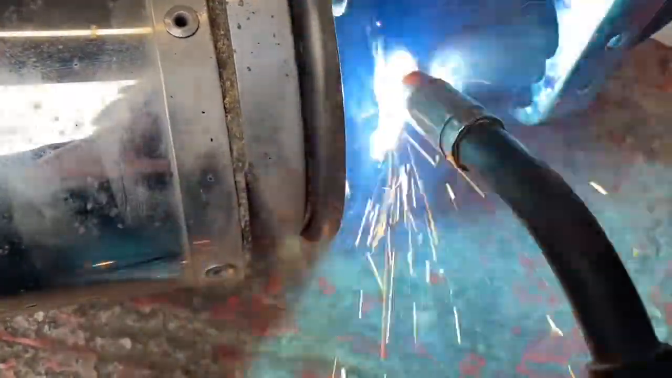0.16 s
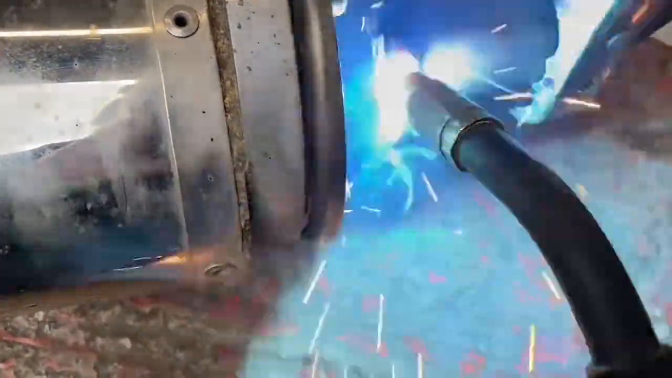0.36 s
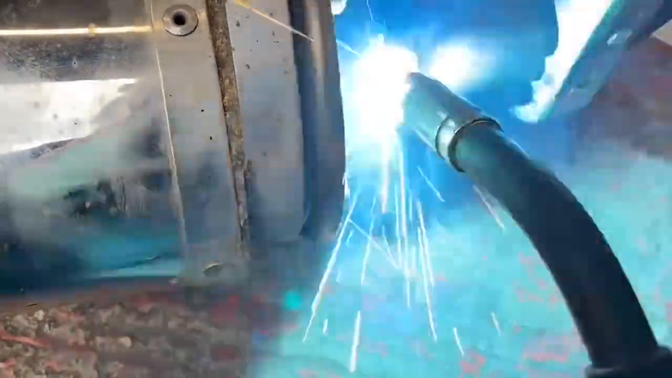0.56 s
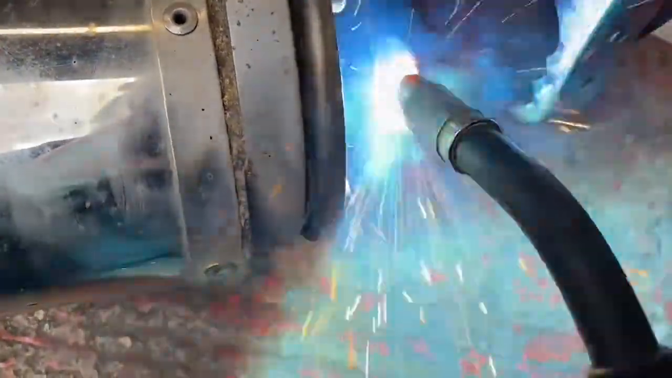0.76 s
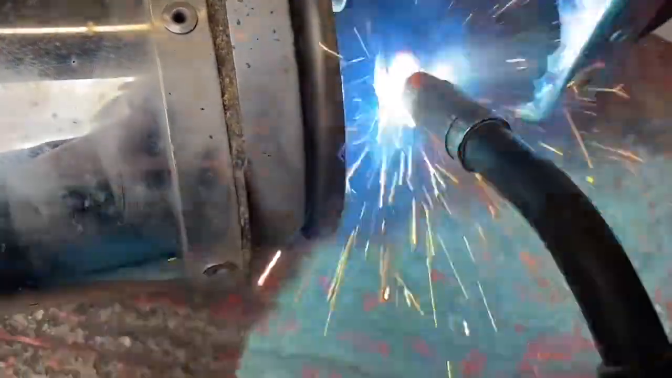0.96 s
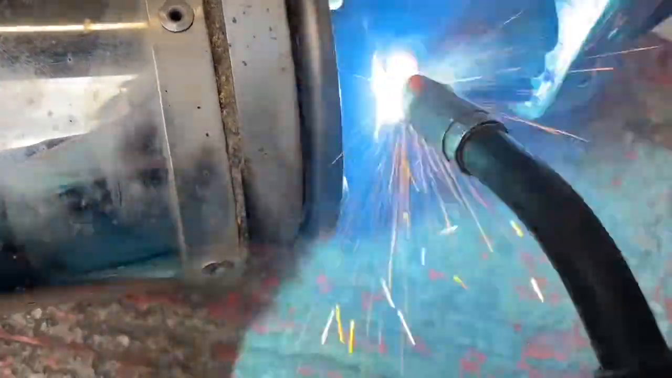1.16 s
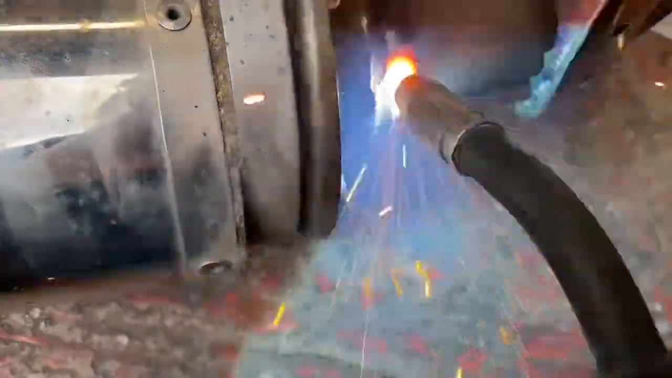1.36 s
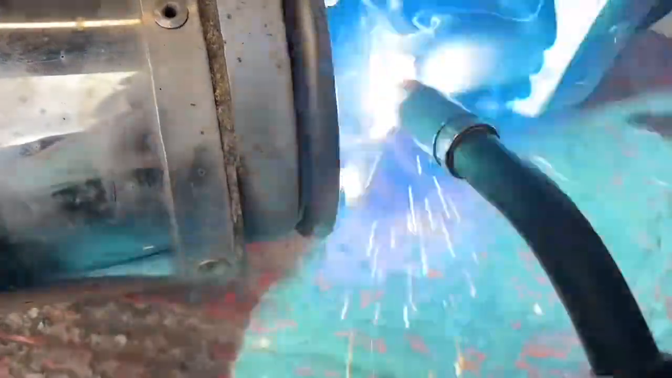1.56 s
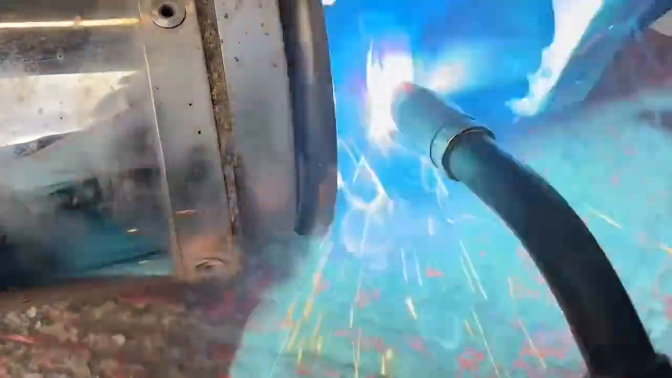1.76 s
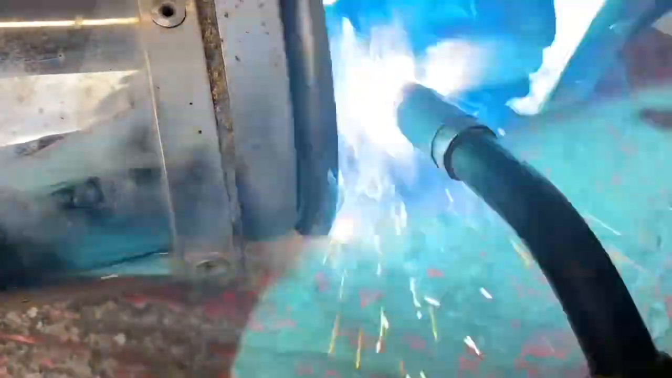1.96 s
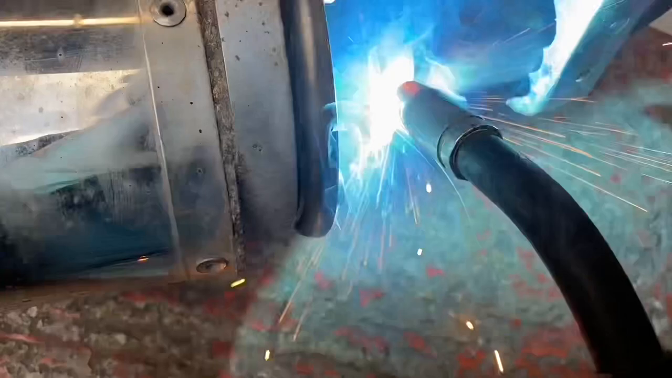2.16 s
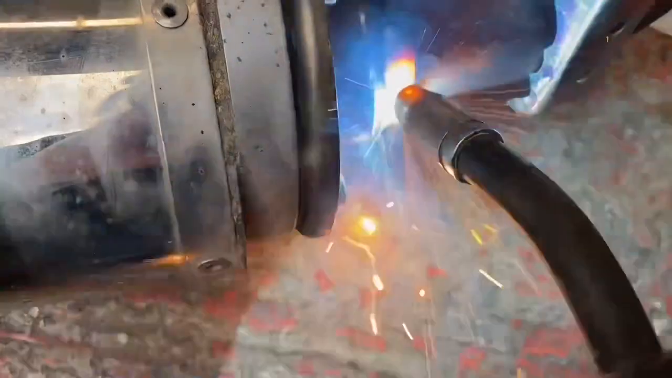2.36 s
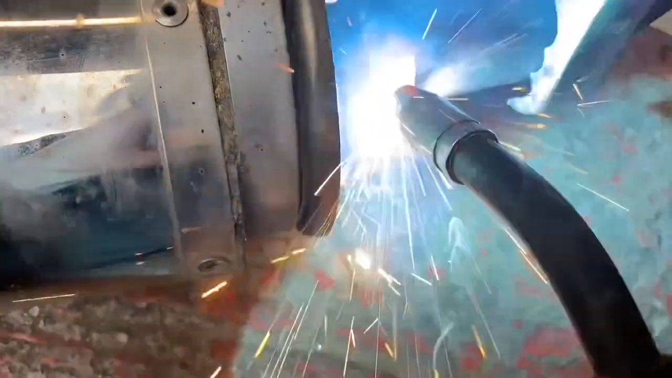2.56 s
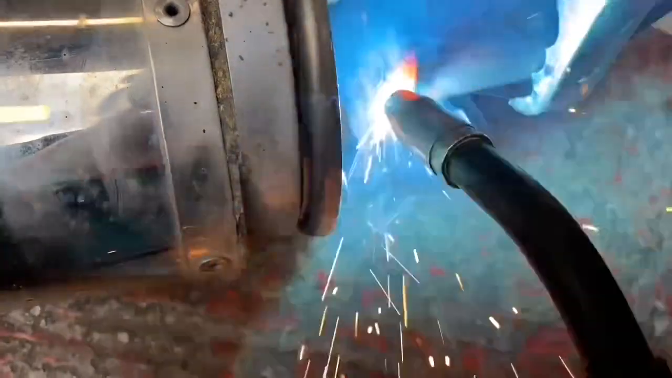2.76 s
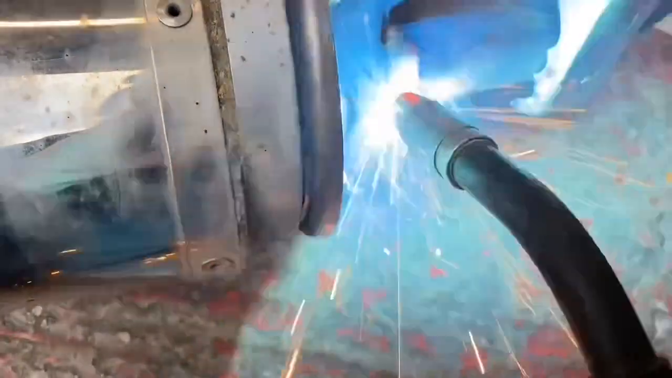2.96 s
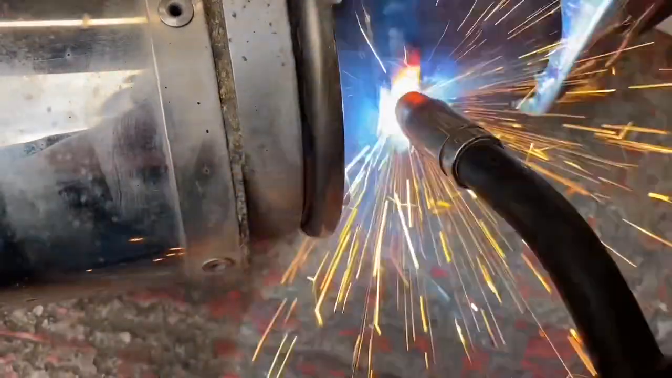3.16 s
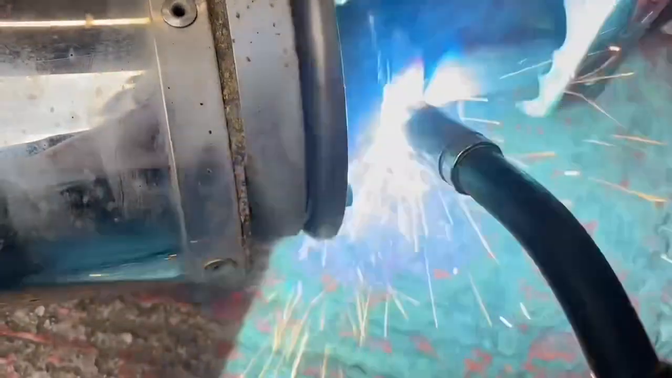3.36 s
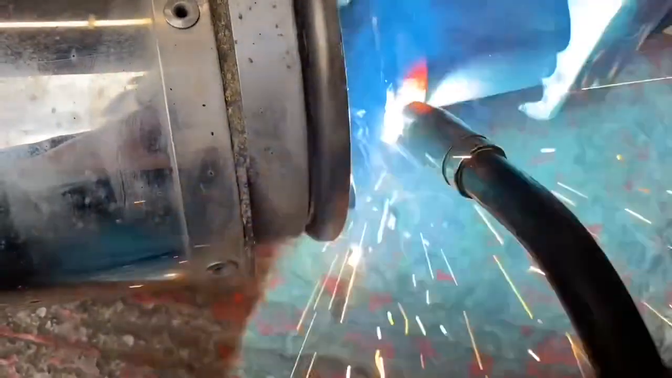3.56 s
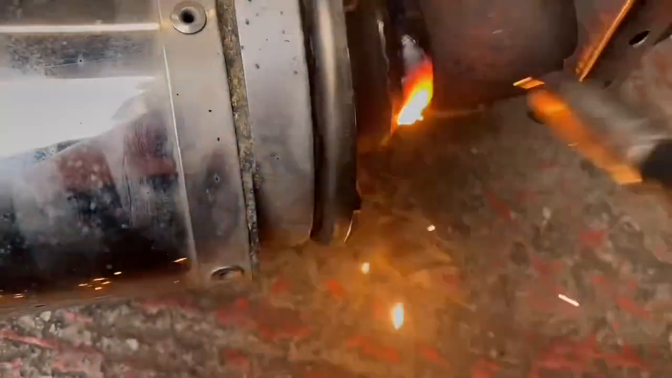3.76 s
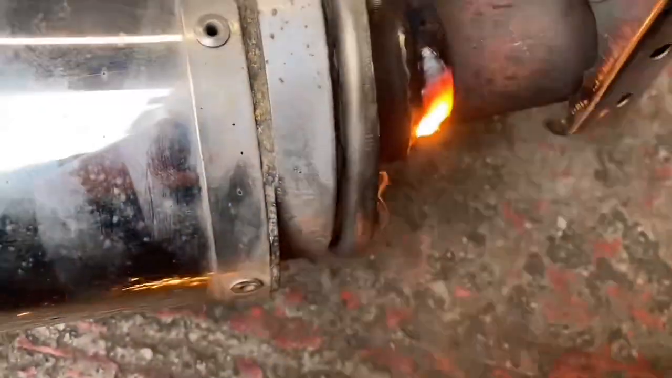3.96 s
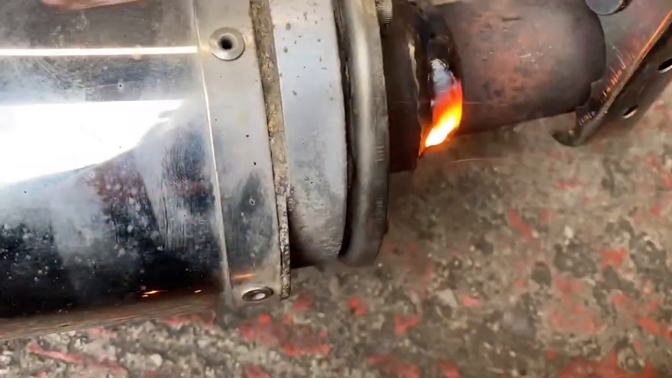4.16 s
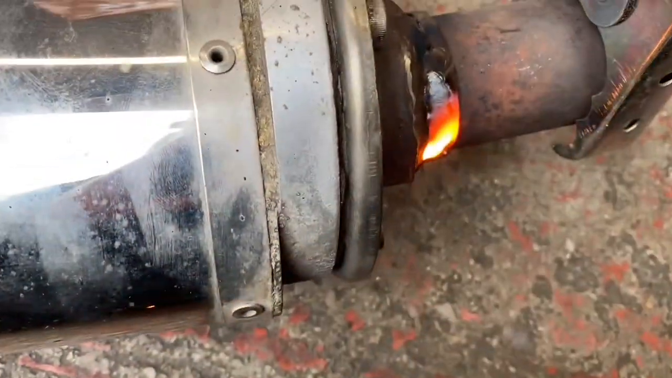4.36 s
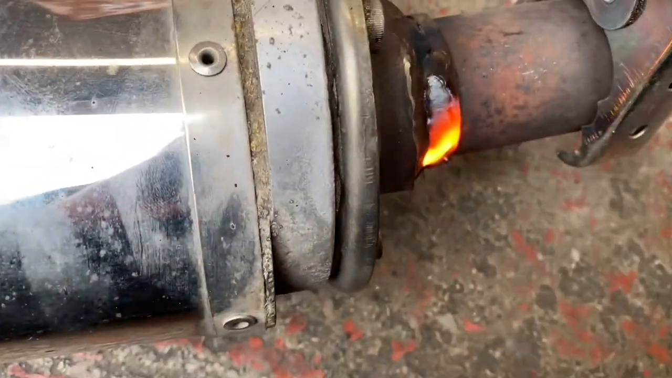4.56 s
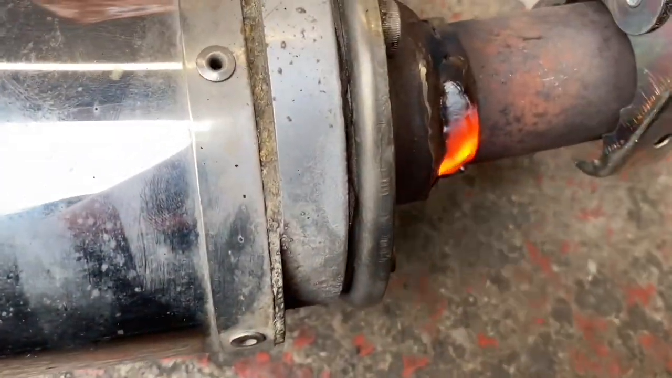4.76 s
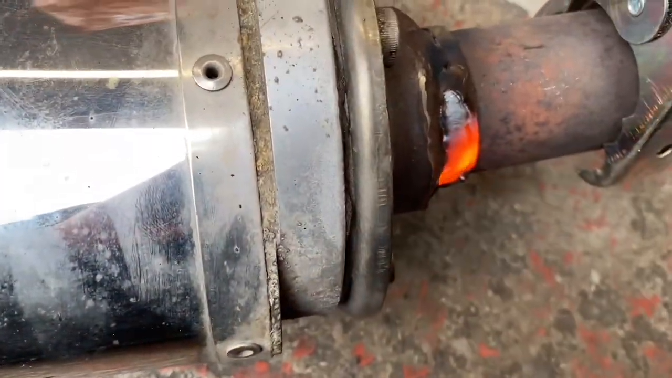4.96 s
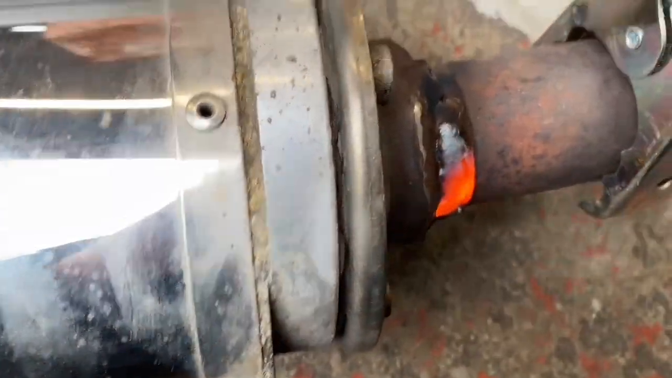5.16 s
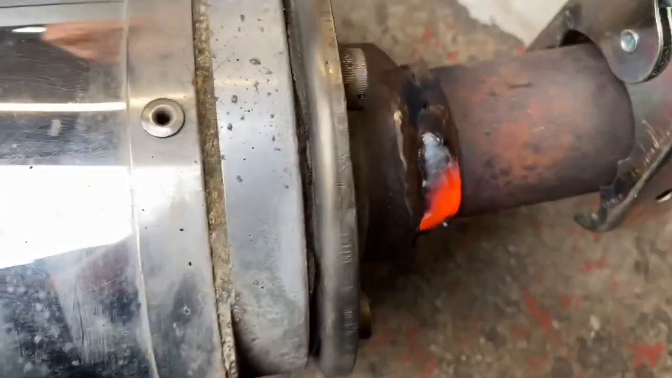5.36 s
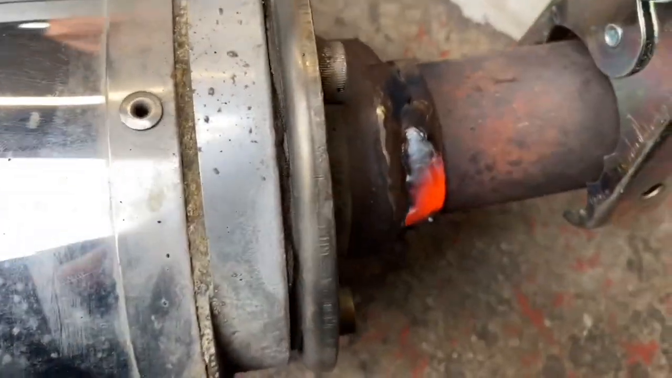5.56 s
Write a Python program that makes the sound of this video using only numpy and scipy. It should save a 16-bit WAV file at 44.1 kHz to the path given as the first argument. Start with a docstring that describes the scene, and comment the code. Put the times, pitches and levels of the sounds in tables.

```python
"""A MIG welding arc runs a bead round a steel exhaust pipe, close by in a workshop.
On every second or third swell of the current, in flurries on each one, the wire shorts and the arc
relights: it cracks, sprays spatter and excites the pipe's resonances, and sizzles in between.
The transformer hums under the load and big drops burst with a thump. The arc stops, the hot joint
ticks, the torch knocks lightly, and a low drone goes on over the noise of the room."""
import sys
import numpy as np
from scipy import signal
from scipy.fft import rfft, irfft
from scipy.io import wavfile
from scipy.ndimage import uniform_filter1d

SR = 44100
rng = np.random.default_rng(int(sys.argv[2]) if len(sys.argv) > 2 else 0)


def wav_record(signal):
    """Record a signal, one row per channel, as 16-bit PCM in the file named by sys.argv[1]."""
    frames = np.transpose(np.atleast_2d(signal))
    bounded = np.clip(frames, -1, 1)
    # unit amplitude maps onto the largest positive 16-bit level
    quanta = np.round(bounded * 32767).astype(np.int16)
    wavfile.write(sys.argv[1], SR, quanta)


N = 247401
T = np.arange(N) / SR
PAD = 2 ** 18
HZ = np.arange(PAD // 2 + 1) * SR / PAD + 1e-3
SIDES = np.array([[.5], [-.5]])  # shares a level or phase difference between left and right
MAINS_HZ, SWELL_S = 50, .01  # the rectified current swells twice in each mains cycle
FIRST_CREST_S, ARC_OFF_S = .0034, 3.628

# Levels in the tables are relative; each source adds its own gain and filtering.
# loudest relights of the arc: (time [s], crack level [dB], spatter level [dB])
LOUD_RELIGHTS = [(0.033, -6, -16.5), (0.0629, -4.5, -12.5), (0.115, -10, -9.5), (0.1419, -9, -19),
                 (0.1631, -6.5, -13.5), (0.1822, -5, -14), (0.2025, -5.5, -20.5), (0.2324, -9, -21),
                 (0.2631, -6, -12), (0.282, -6.5, -17), (0.3331, -10.5, -19.5), (0.343, -3.5, -28.5),
                 (0.3945, -6.5, -10.5), (0.443, -11.5, -15), (0.493, -7, -25), (0.5329, -8.5, -10.5),
                 (0.563, -11, -8.5), (0.585, -9, -15), (0.6017, -14, -6), (0.6723, -6, -21),
                 (0.6945, -9.5, -10.5), (0.7325, -9, -17.5), (0.7523, -7, -17), (0.7932, -7.5, -18.5),
                 (0.8129, -10, -18), (0.8528, -7, -20.5), (0.8833, -9.5, -9.5), (0.9325, -9, -22),
                 (0.9625, -8, -8), (1.0136, -6, -15), (1.1416, -8.5, -23), (1.2226, -5.5, -7.5),
                 (1.2742, -9.5, -14.5), (1.3129, -7.5, -18), (1.3224, -6, -19.5), (1.351, -10, -15),
                 (1.3757, -11.5, -17.5), (1.4028, -6, -7.5), (1.4744, -10, -4), (1.4848, -3, -12.5),
                 (1.5358, -5, -16.5), (1.5622, -6.5, -14.5), (1.5922, -12, -8), (1.655, -3, -7),
                 (1.673, -13.5, -8), (1.7622, -9, -16.5), (1.8036, -4, -16.5), (1.8831, -11, -15),
                 (1.9049, -10, -10), (1.9322, -8, -10.5), (1.9828, -9, -5.5), (2.042, -10.5, -20),
                 (2.0647, -8.5, -16.5), (2.103, -7.5, -14), (2.125, -2.5, -12), (2.1514, -7, -17.5),
                 (2.172, -8, -15.5), (2.2538, -9, -10.5), (2.321, -12, -15), (2.4133, -11.5, -12),
                 (2.4937, -14, -8), (2.5328, -12, -12.5), (2.5621, -9, -12), (2.5725, -6.5, -16),
                 (2.6727, -9, -15), (2.7018, -6, -17), (2.7321, -6, -16.5), (2.7842, -5, -6.5),
                 (2.8043, -9, -2.5), (2.8914, -8.5, -14.5), (2.922, -18.5, -9.5), (2.9716, -9, -19.5),
                 (3.0046, -10, -19.5), (3.1344, -7.5, -19), (3.2125, -10.5, -20.5), (3.2436, -7.5, -3.5),
                 (3.2627, -6, -17.5), (3.303, -10.5, -4.5), (3.3335, -2, -6), (3.362, -5, -4),
                 (3.4131, -6.5, -9.5), (3.4361, -5.5, -6), (3.4635, -4.5, -7.5), (3.5035, -7.5, -13.5),
                 (3.5241, -6, -10), (3.544, -4.5, -13)]
# flurries, in which the wire shorts on every swell: (start [s], end [s])
FLURRY_SPANS = [(.38, 0.44), (.61, .64), (.75, 0.83), (.88, 0.93), (.96, 1.032), (1.16, 1.207), (1.42, 1.5),
                (1.59, 1.706), (2.19, 2.22), (3.04, 3.19), (3.57, 3.65)]
# lulls in which the ordinary cracks pause: (start [s], end [s])
LULL_SPANS = [(.07, 0.15), (.35, .37), (.45, .49), (2.07, 2.135), (2.54, 2.56), (2.81, 2.85), (3.27, 3.3)]
# ordinary drops fed by the wire: (time [s], interval [s], level [dB])
WIRE_FEED = [(0, .027, -1), (.2, .024, -1), (.65, .021, 0), (1.1, .021, -1), (1.3, .027, -1),
             (1.5, .023, 1), (1.8, .025, -1), (2.05, .028, -1), (2.35, .022, -2), (2.7, .029, -1),
             (3.1, .023, -1.5), (3.3, .03, 0), (3.6, .021, -3)]
# burning arc: (time [s], sizzle level [dB], spitting level [dB], gain of the cracks' body [dB])
ARC_LEVELS = [(0, -47.5, -33.5, 1), (.4, -49, -44.5, 2), (.7, -45, -42, 1), (1.2, -53, -48, 0.5),
              (1.6, -46.5, -40.5, -1.5), (2, -56, -41, -2), (2.45, -53.5, -37.5, -1),
              (2.9, -51.5, -39.5, -2.5), (3.15, -49.5, -38, -2), (3.62, -54.5, -43.5, -1.5)]
# modes of the pipe and gas nozzle: (frequency [Hz], bandwidth [Hz], level [dB])
PIPE_MODES = [(836, 70, -8), (1800, 380, 1.5), (2730, 110, -3), (3180, 130, -5.5), (3870, 240, 2),
              (5430, 240, -5.5), (5440, 300, -1.5), (5670, 63, -6.5), (6360, 90, -9), (7080, 110, 1.5),
              (7700, 250, -4.5), (10730, 110, -6.5), (11340, 100, -3), (11410, 180, 1.5), (15340, 400, 0)]
# narrow dips in the arc's treble: (frequency [Hz], bandwidth [Hz], level subtracted [dB])
ARC_DIPS = [(3570, 200, -9.5), (8680, 780, -6), (13650, 1000, -4)]
# arc spectrum at the two microphone ports: (frequency [Hz], left gain [dB], right gain [dB])
ARC_SPECTRUM = [(374, -7.5, -4), (725, -13, -9.5), (1335, -7.5, -6), (1740, -5, -0.5), (2410, -8, -4),
                (3500, -11.5, -4.5), (4696, -19, -5), (5500, -9, 3.5), (6370, -7, -3), (8300, -8, -7.5),
                (10030, -6.5, -7.5), (11300, -6, -5.5), (13290, -5.5, -5), (15700, -9, -9.5)]
# phase difference between the ports: (frequency [Hz], lead of the left [rad])
PORT_LEAD = [(300, 1.24), (1100, 0.72), (2000, -0.78), (3200, -2), (5200, -2.5), (6500, -5), (7600, -6),
             (8600, -3.5), (11200, 0.5), (13300, 2), (16000, 7.5)]
# tone colour of the reverberant tail, with two treble dips: (frequency [Hz], gain [dB])
TAIL_COLOUR = [(150, 5.5), (330, 7), (520, 1), (1200, 1.5), (2000, -2.5), (3500, -1.5), (5500, 1),
               (7500, -1), (9000, -11), (11300, -8), (13500, -13), (15500, -7)]
# transformer's 200 Hz line under load: (time [s], level [dB])
HUM_LEVELS = [(0, -45), (0.2, -50.5), (0.32, -38), (0.46, -37), (0.72, -60.5), (0.9, -37.5), (1.1, -42),
              (1.28, -61), (1.45, -45.5), (1.85, -72.5), (2.15, -40.5), (2.35, -55), (2.52, -47),
              (2.8, -44.5), (2.92, -61.5), (3.08, -38), (3.65, -40.5)]
# workshop noise: (frequency [Hz], spectral level [dB])
AIR_SPECTRUM = [(25, -29.5), (60, -14.5), (110, -4), (180, -1), (260, -7.5), (420, -23.5), (700, -27),
                (1000, -22.5), (1400, -24.5), (2200, -29), (3500, -39.5), (5500, -39), (8500, -55),
                (11200, -47.5), (14000, -55)]
# low drone: (time [s], level [dB])
DRONE_LEVELS = [(3.75, -63.5), (4.7, -72), (4.85, -51), (5, -50.5), (5.17, -60), (5.3, -49.5), (5.46, -59),
                (5.61, -47)]
# faint ring of the hot pipe: (time [s], level [dB])
RING_LEVELS = [(0, -91), (3.7, -82), (4.25, -80), (4.38, -72), (4.55, -89), (5.6, -89.5)]
# low rumble: (time [s], level [dB])
RUMBLE_LEVELS = [(0, -55.5), (3.7, -64), (4.1, -70), (4.7, -85), (5.1, -74), (5.3, -60), (5.6, -56)]
# heavy bursts of molten drops: (time [s], level [dB], high-pass corner [Hz])
DROP_BURSTS = [(1.484, -30, 15), (1.654, -15.5, 15), (2.124, -32, 20), (2.254, -23.5, 30),
               (2.783, -27, 120), (2.804, -12.5, 75), (3.244, -24, 15), (3.302, -19.5, 20),
               (3.333, -16, 55), (3.362, -31, 60), (3.463, -22, 70)]
# body of those bursts: (frequency [Hz], gain [dB])
BURST_SPECTRUM = [(20, -27), (52, 0.5), (110, -3.5), (250, -5), (600, -11), (1000, -14), (1600, -39.5),
                  (4000, -75)]
# hot steel and scale: (time [s], tick level [dB], fizz level [dB], fizz decay [s])
SCALE_TICKS = [(3.63, -45, -56, 0.089), (3.857, -39, -70, 0.023), (3.92, -47, -62, 0.19),
               (4.1178, -28, -47.5, 0.047), (4.875, -45, -67, 0.034), (4.919, -45, -68, 0.033),
               (4.9839, -23, -45.5, 0.026), (5.223, -40, -68, .02), (5.272, -48.5, -66, .03)]
# spectrum of those ticks: (frequency [Hz], gain [dB])
TICK_SPECTRUM = [(200, -9.5), (900, -3), (2000, -1), (4000, -9), (5700, -3), (7600, -9.5), (9000, -25),
                 (11300, -1.5), (13500, -25), (15400, -13)]
# modes of the steel after a tick: (frequency [Hz], bandwidth [Hz], level [dB])
STEEL_MODES = [(2080, 10.9, 10), (3960, 10, 6), (5320, 22, 8), (5430, 20, 7), (6280, 12, 7)]
# light knocks as the torch is moved away: (time [s], level [dB])
TORCH_KNOCKS = [(4.827, -29), (5.5456, -27)]
# spectrum of those knocks: (frequency [Hz], gain [dB])
KNOCK_SPECTRUM = [(200, -9), (1100, 3), (2000, -9), (6000, -15), (12000, -30)]


def undb(db):
    """Amplitude ratio of a level in decibels."""
    return 10 ** (np.asarray(db) / 20)


def curve(rows, column=1):
    """Envelope: one column of a table, interpolated linearly in time."""
    columns = np.transpose(rows)
    return np.interp(T, columns[0], columns[column])


def colour(rows, column=1):
    """Magnitude response: a column of decibels, interpolated over log frequency."""
    columns = np.transpose(rows)
    return undb(np.interp(np.log(HZ), np.log(columns[0]), columns[column]))


def filtered(x, response):
    """Linear filtering: the spectrum is multiplied by a frequency response."""
    return irfft(rfft(x, PAD) * response, PAD)[..., :N]


def resonances(modes):
    """Superposition of damped modes: (frequency [Hz], bandwidth [Hz], level [dB])."""
    return sum(undb(db) / (1 + 1j * (HZ ** 2 - hz ** 2) / (width * HZ)) for hz, width, db in modes)


def unit(x):
    """Normalisation to an RMS of one."""
    return x / np.sqrt(np.mean(x ** 2))


def wander(rate_hz):
    """Random modulation: held values, smoothed twice, with a spread near one."""
    hold = int(SR / rate_hz)
    steps = np.repeat(rng.standard_normal(N // hold + 1), hold)
    return 1.3 * uniform_filter1d(uniform_filter1d(steps, hold), hold)[:N]


def impulses(times, sizes):
    """Impulse train with one spike for each event."""
    return np.bincount(np.clip(np.round(times * SR).astype(int), 0, N - 1), sizes, N)


def fading(x, decay_s):
    """Exponential decay after each spike."""
    return signal.lfilter([1], [1, -np.exp(-1 / (decay_s * SR))], x)


def grains(spread_db):
    """Impulsive noise: dense tiny clicks of log-normal size."""
    return unit(rng.standard_normal(N) * undb(spread_db * rng.standard_normal(N)))


def band(hz, width_hz):
    """Narrow-band noise: white noise through the same resonance twice."""
    return unit(filtered(rng.standard_normal(N), resonances([(hz, width_hz, 0)]) ** 2))


def reverberation(x, t60_s=.55, treble_t60_s=.37, build_s=.0055):
    """The diffuse field of the workshop differs on each side; its treble decays first."""
    t = T[:SR]
    noise = rng.standard_normal((2, SR))
    low = signal.sosfilt(signal.butter(2, 4000, fs=SR, output="sos"), noise)
    tail = low * undb(-60 * t / t60_s) + (noise - low) * undb(-60 * t / treble_t60_s)
    tail *= 1 - np.exp(-t / build_s)
    tail /= np.sqrt(np.sum(tail ** 2) / 2)
    return signal.fftconvolve(np.atleast_2d(x), tail, axes=1)[:, :N]


def early_reflections(x, echo_db=-5, decay_s=.0023, gap_s=.0005):
    """Echoes from floor, muffler and bracket interfere with the direct sound at each port."""
    t = T[:SR // 30]
    cluster = rng.standard_normal((2, len(t))) * np.exp(-t / decay_s) * (t > gap_s)
    cluster /= np.sqrt(np.sum(cluster ** 2, axis=1, keepdims=True))
    response = 1 + undb(echo_db) * rfft(cluster, PAD)
    # the spectrum ripples finely but keeps its broad shape
    broad_power = uniform_filter1d(np.abs(response) ** 2, size=PAD // 260, axis=1)
    return filtered(x, response / np.sqrt(broad_power))


def short_circuits(crests, loud, flurry, lull):
    """Short-circuit transfer: marks the crests on which the wire sheds a drop."""
    feed_s, interval_s, _ = np.transpose(WIRE_FEED)
    crests_per_drop = np.interp(crests, feed_s, interval_s) / SWELL_S
    # between loud cracks and flurries the drops follow the pace of the feed
    anchors = np.union1d(loud, np.flatnonzero(flurry))
    shorts = np.zeros(len(crests), bool)
    for start, end in zip(anchors, anchors[1:]):
        drops = max(round((end - start) / crests_per_drop[start]), 1)
        shorts[np.round(np.linspace(start, end, drops + 1)).astype(int)] = True
    shorts &= ~lull
    shorts[loud] = True
    return shorts


def relights(crack_db=-9, spatter_db=-17.5, vary_db=3, jitter_s=.0012, flurry_db=-1,
             graze_db=-12, graze_share=.2, double_db=-5, double_share=.25, double_s=.004):
    """The arc reignites near crests of the current: (time [s], crack [dB], spatter [dB])."""
    crests = np.arange(FIRST_CREST_S, T[-1], SWELL_S)
    late, force, splash, delay = rng.standard_normal((len(crests), 4)).T
    graze, double = rng.random((len(crests), 2)).T
    loud = np.round((np.transpose(LOUD_RELIGHTS)[0] - FIRST_CREST_S) / SWELL_S).astype(int)
    flurry, lull = (np.any([(crests > start) & (crests < end) for start, end in spans], axis=0)
                    for spans in (FLURRY_SPANS, LULL_SPANS))
    shorts = short_circuits(crests, loud, flurry, lull)
    # ordinary drops vary, up to a limit in size
    feed_s, _, feed_db = np.transpose(WIRE_FEED)
    drop_db = np.interp(crests, feed_s, feed_db) + vary_db * np.minimum(force, .8)
    drop_db += flurry_db * flurry + graze_db * ~shorts
    splash_db = drop_db + vary_db * np.minimum(splash, .8)
    first = np.column_stack([crests + jitter_s * late, crack_db + drop_db, spatter_db + splash_db])
    # on the other crests the wire now and then just grazes the pool
    heard = (shorts | (graze < graze_share)) & (crests < ARC_OFF_S)
    # some drops part in two steps, so a weaker crack follows
    second = first + [0, double_db, double_db]
    first[loud] = LOUD_RELIGHTS
    second[:, 0] = first[:, 0] + double_s * np.exp(.3 * delay)
    return np.vstack([first[heard], second[heard & (double < double_share)]])


def sizzle_envelope(times, crowd_db=4, vary_db=4):
    """Amplitude follows event density: the pool boils louder where relights crowd together."""
    window = signal.windows.hann(SR // 16)
    crowd = np.minimum(signal.fftconvolve(impulses(times, np.ones(len(times))), window, "same"), 4)
    return undb(curve(ARC_LEVELS, column=1) + crowd_db * (crowd - 1.5) + vary_db * wander(250))


def droplets(envelope, scatter=.9, corner_hz=450):
    """Small sources radiate little bass; droplets fly all ways, so each port hears some of its own."""
    shared = grains(spread_db=4)
    separate = np.array([grains(spread_db=3), grains(spread_db=5)])
    return filtered(envelope * unit(shared + scatter * separate), HZ / np.hypot(HZ, corner_hz))


def drop_body(x, split_hz=3000, vary_db=2):
    """Source size shapes the spectrum: each drop makes a fuller or thinner crack than the last."""
    body = filtered(x, 1 / (1 + (HZ / split_hz) ** 2))
    return x + body * (undb(curve(ARC_LEVELS, column=3) + vary_db * wander(70)) - 1)


def spitting(corner_hz=6000, gain_db=-1.5, vary_db=6):
    """Fine sparks from the pool make bright noise, amplitude-modulated into millisecond puffs."""
    puffs = undb(curve(ARC_LEVELS, column=2) + gain_db + vary_db * np.minimum(wander(220), 2))
    return filtered(puffs * grains(spread_db=5.5), HZ ** 2 / (HZ ** 2 + corner_hz ** 2))


def arc(crack_gain_db=14, spatter_gain_db=.5, trail_db=-20, touch_db=-24, touch_s=.003, ripple=.82):
    """Pressure impulses mark each touch and relight; the current modulates the sizzle between."""
    times, crack_db, spatter_db = relights().T
    lead, force = rng.standard_normal((N // 256, 2))[:len(times)].T
    cracks = impulses(times, undb(crack_db + crack_gain_db))
    # the wire ticks against the pool just before each crack
    touch_times = times - touch_s * np.exp(.3 * lead)
    touches = impulses(touch_times, undb(crack_db + crack_gain_db + touch_db + 4 * force))
    bursts = impulses(times, undb(spatter_db))
    spray = undb(spatter_gain_db) * fading(bursts, decay_s=.0015)
    spray += undb(trail_db) * fading(bursts, decay_s=.005)
    current = (1 + ripple * np.cos(2 * np.pi * (T - FIRST_CREST_S) / SWELL_S)) * (T < ARC_OFF_S)
    frying = droplets(spray + sizzle_envelope(times) * current)
    return drop_body(cracks + touches + frying) + spitting() * current


def weld(ring_db=-3, room_db=-19, bass_cut_hz=140, gain_db=1.6):
    """Resonance: the arc rings the pipe, reaches the ports by different paths and fills the room."""
    pipe = 1 + undb(ring_db) * resonances(PIPE_MODES)
    treble_dips = 1 - resonances(ARC_DIPS)
    bass_cut = HZ / np.hypot(HZ, bass_cut_hz)
    lead = np.exp(1j * np.interp(HZ, *np.transpose(PORT_LEAD)))
    ports = np.array([colour(ARC_SPECTRUM, column=1) * lead, colour(ARC_SPECTRUM, column=2)])
    direct = filtered(arc(), undb(gain_db) * pipe * treble_dips * bass_cut * ports)
    near = early_reflections(direct)
    return near + undb(room_db) * reverberation(filtered(direct, colour(TAIL_COLOUR)))


def transformer(idle_db=-63, second_db=-63, sixth_db=-62, release_s=.17, fade_s=.051, hold_s=.033,
                flutter_db=1.2, pan_db=-1.5, port_rad=.39):
    """The core vibrates at even harmonics of the mains, sinking to an idle hum when the arc stops."""
    phase = 2 * np.pi * MAINS_HZ * T + .15 * wander(12)
    load = np.exp(-np.maximum(T - ARC_OFF_S, 0) / release_s) * undb(2.2 * wander(14))
    working = np.exp(-np.maximum(T - ARC_OFF_S - hold_s, 0) / fade_s)
    strength = working * undb(curve(HUM_LEVELS)) + (1 - working) * undb(idle_db)
    # standing waves in the room give the main line another level and phase at each port
    port_gain = undb(pan_db * SIDES + flutter_db * wander(45))
    fourth = strength * port_gain * np.sin(4 * phase + port_rad * SIDES)
    neighbours = undb(second_db) * np.sin(2 * phase) + undb(sixth_db) * np.sin(6 * phase)
    return np.sqrt(2) * (fourth + load * neighbours)


def room_noise(level_db=-59.5, wide_hz=500):
    """Soft broadband noise whose coherence between the sides is greatest in the bass."""
    spectrum = colour(AIR_SPECTRUM)
    mid = filtered(rng.standard_normal(N), spectrum)
    side = filtered(rng.standard_normal(N), spectrum * np.minimum(HZ / wide_hz, .8))
    return unit(mid + 2 * SIDES * side) * undb(level_db + wander(5.09))


def drone(hz=156, gain_db=-1, waver_db=3):
    """A low tone wavers under random frequency and amplitude modulation."""
    phase = 2 * np.pi * np.cumsum(hz * (1 + .035 * wander(18))) / SR
    return np.sqrt(2) * undb(curve(DRONE_LEVELS) + gain_db + waver_db * wander(16)) * np.sin(phase)


def pipe_ring():
    """A narrow resonance of the hot pipe rings faintly."""
    return undb(curve(RING_LEVELS)) * band(hz=1415, width_hz=70)


def rumble():
    """Low band-limited noise comes and goes in the workshop."""
    return undb(curve(RUMBLE_LEVELS)) * band(hz=77, width_hz=73)


def thumps(gain_db=41, pan_db=-.5, port_rad=.35, room_db=-18):
    """A big drop blows apart and displaces air, radiating a low pressure pulse."""
    puffs = np.zeros(N)
    for time_s, db, corner_hz in DROP_BURSTS:
        burst = impulses(np.array([time_s]), [undb(db + gain_db)])
        puffs += signal.lfilter(*signal.butter(1, corner_hz, "high", fs=SR), burst)
    ports = undb(pan_db * SIDES) * np.exp(1j * port_rad * SIDES)
    direct = filtered(puffs, colour(BURST_SPECTRUM) * ports)
    return direct + undb(room_db) * reverberation(direct)


def cooling_ticks(room_db=-5):
    """Scale cracks off the hot bead; each tick and brief fizz excites the modes of the steel."""
    times, tick_db, _, _ = np.transpose(SCALE_TICKS)
    fizz = sum(undb(db) * fading(impulses(np.array([time_s]), [1.]), decay_s)
               for time_s, _, db, decay_s in SCALE_TICKS)
    excitation = impulses(times, undb(tick_db)) + fizz * grains(spread_db=7)
    direct = filtered(excitation, colour(TICK_SPECTRUM) * (1 + resonances(STEEL_MODES)))
    return direct + undb(room_db) * reverberation(direct)


def torch_knocks(room_db=-1):
    """Damped impacts: the torch and its hose bump dully as they are drawn back."""
    times, db = np.transpose(TORCH_KNOCKS)
    direct = filtered(impulses(times, undb(db)), colour(KNOCK_SPECTRUM))
    return direct + undb(room_db) * reverberation(direct)


def scene():
    """Superposition: the pressures of all sources add at the two ports."""
    work = weld() + thumps() + transformer() + cooling_ticks() + torch_knocks()
    return work + room_noise() + drone() + pipe_ring() + rumble()


def record(dry, lag_cycles=.95, corner_hz=25, top_hz=15900):
    """Group delay in the microphone's filters holds back the bass; peaks clip and the top is cut."""
    delayed = filtered(dry, np.exp(-2j * np.pi * lag_cycles * np.log(1 + HZ / corner_hz)))
    low_pass = signal.ellip(8, .2, 70, top_hz, fs=SR, output="sos")
    return signal.sosfilt(low_pass, np.clip(delayed, -1, 1))


dry = scene()
out = record(dry)
wav_record(out)
```